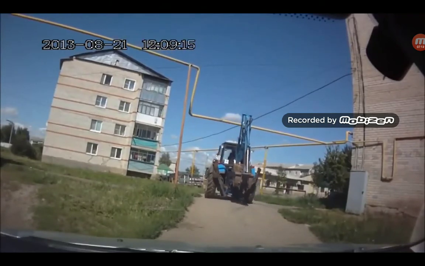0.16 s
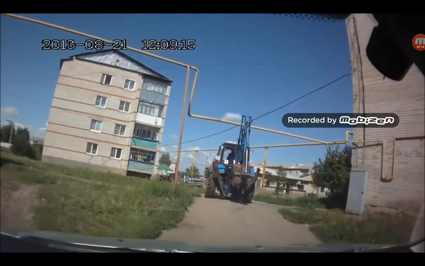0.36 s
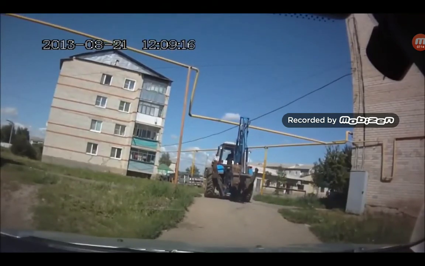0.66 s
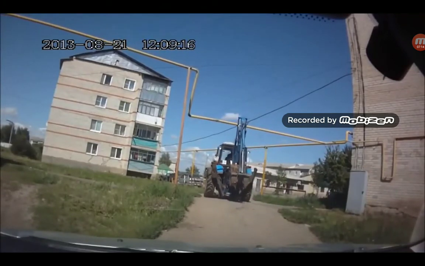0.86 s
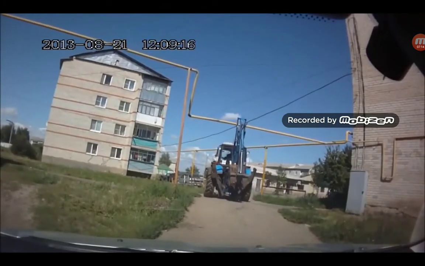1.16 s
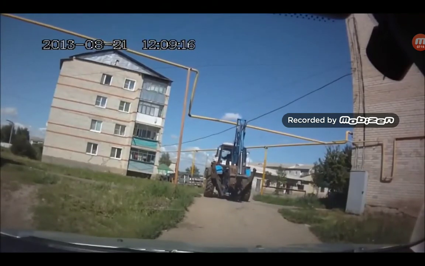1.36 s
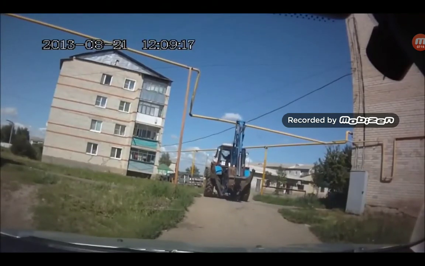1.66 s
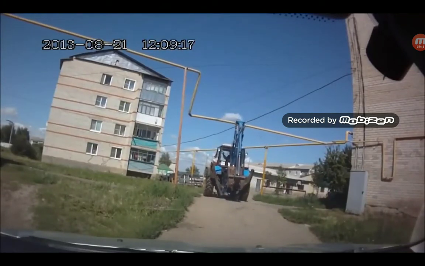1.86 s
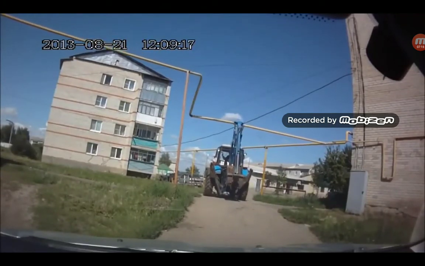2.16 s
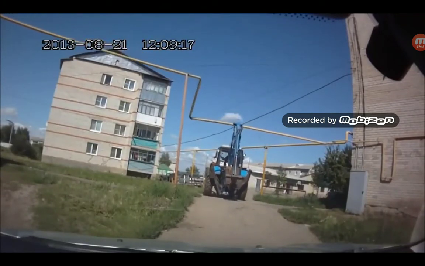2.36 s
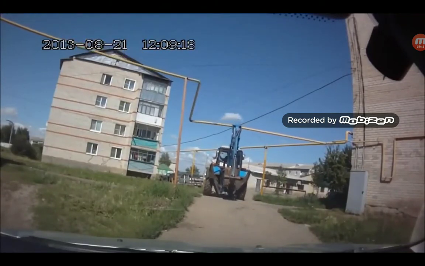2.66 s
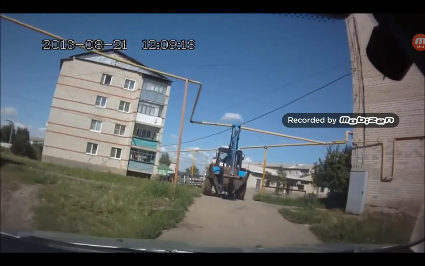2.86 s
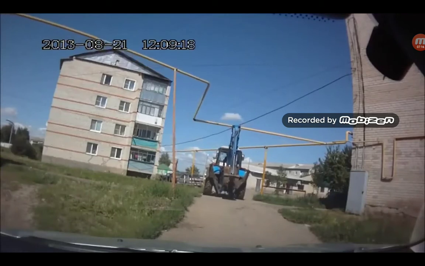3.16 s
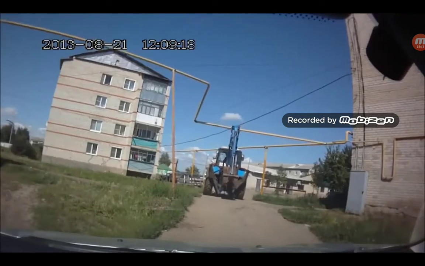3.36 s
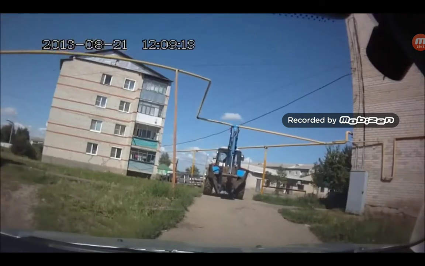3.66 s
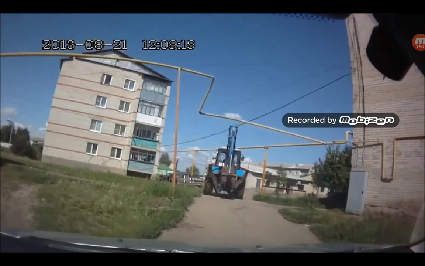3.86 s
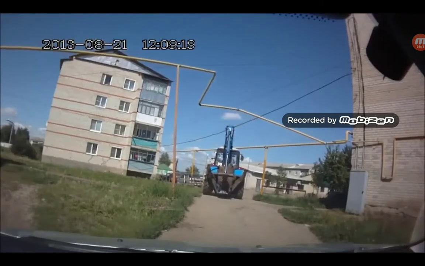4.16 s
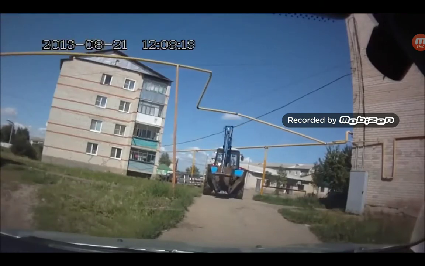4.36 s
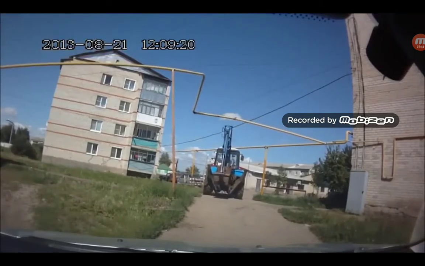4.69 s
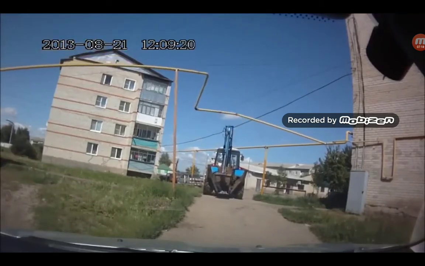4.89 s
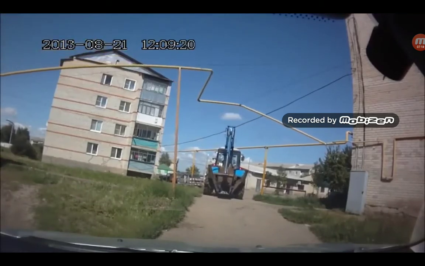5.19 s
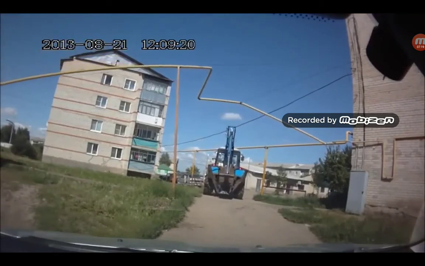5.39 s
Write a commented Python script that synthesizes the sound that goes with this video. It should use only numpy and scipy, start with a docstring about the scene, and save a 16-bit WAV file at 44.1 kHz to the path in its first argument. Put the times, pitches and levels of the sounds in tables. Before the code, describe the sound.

A loud two-note car horn sounds from the very start, heard from inside a car creeping along a dirt lane. It holds a steady pitch until about 3.4 seconds, with a faint echo and a rasp from the slightly overloaded dashboard microphone. Beneath it, engine and tyres drone and loose plastic trim chatters, with brief rattles near 1, 2.2 and 3.2 seconds. In the short gap a sharp knock sounds at about 3.6 seconds, and the horn immediately returns for half a second, ending near 4.1 seconds. The cabin drone then steps up and slowly grows as the car pulls on, joined by a rough, wavering whine from the drive train. Another hard knock over a rut comes at about 4.5 seconds, followed by a softer knock near 5.1 seconds and a small rattle near 5.3. The drone and whine continue to the end.

```python
"""Honking behind a tractor

Inside a car creeping along a dirt lane, a two-note horn is held, let go briefly and pressed again.
Engine and tyres drone through the cabin, loose trim rattles and knocks over the ruts, and the drive
train whines as the car pulls on. A small dashboard microphone overloads, mixing the notes into a rasp."""
import sys
import numpy as np
from scipy import signal
from scipy.fft import rfft, irfft, next_fast_len
from scipy.io import wavfile
from scipy.ndimage import map_coordinates

SR = 44100
rng = np.random.default_rng(int(sys.argv[2]) if len(sys.argv) > 2 else 0)


def unload_audio(sound):
    """Save the sound as a 16-bit wav file, at the path given as the first command line argument."""
    columns = np.transpose(np.atleast_2d(sound))
    # keep every value between -1 and 1, then stretch to whole-number steps
    steps = np.round(np.clip(columns, -1, 1) * 32767)
    wavfile.write(sys.argv[1], SR, steps.astype(np.int16))


N = 243861
TIME = np.arange(N) / SR

# the horn button: (pressed [s], released [s])
HORN_PRESSES = [(-.1, 3.362), (3.622, 4.127)]
# each horn's harmonics, the tones at 1, 2, 3 ... times its pitch:
# (level [dB], drift as the car moves between houses [dB/s], change until the low horn settles [dB])
LOW_HORN = [(-23, 0, -1.5), (-23, -0.66, 0.5), (-26.5, -0.16, -1.5), (-37, 0, 1.5), (-36, 0, 5),
            (-58.5, 1, 0.5), (-55.5, 0, 0)]
HIGH_HORN = [(-32, -0.19, 0), (-26.5, 0.23, 0.024), (-24.5, -0.091, 0.017), (-26.5, -.2, 0.026),
             (-39.5, -0.078, -0.22), (-61.5, 0, 0), (-59, 0, 0), (-63, 0.15, 0)]
# tones the horns make together: (multiple of the low pitch, multiple of the high pitch, level [dB])
MIXED_TONES = [(-1, 2, -42), (1, 1, -46), (3, 1, -44), (3, 2, -50), (1, 5, -57), (1, 6, -61), (4, 5, -60),
               (3, 6, -62), (2, 7, -60), (1, 8, -60), (6, 4, -61), (4, 6, -62)]
# raspy hiss that sounds with the horns: (frequency [Hz], relative level [dB])
HISS_SPECTRUM = [(300, -27), (550, 4), (1000, -0.5), (1500, -5), (2100, -2.5), (2600, -15.5), (3400, -18),
                 (4400, -9.5), (4900, -17.5), (6000, -24.5), (7600, -44), (10500, -46.5), (13000, -62)]
# engine and tyres in the cabin: (frequency [Hz], relative level [dB])
DRONE_SPECTRUM = [(30, -45.5), (55, -34.5), (82, -29.5), (115, -5), (180, -5.5), (250, 0.5), (350, 1.5),
                  (480, -3), (720, -6.5), (1030, -15.5), (1500, -7.5), (2500, -34), (6000, -59.5),
                  (12000, -78.5)]
# pitches at which the cabin rings: (pitch [Hz], rough width [Hz], relative level [dB])
CABIN_RESONANCES = [(372.5, 35, -5.5), (676.5, 30, -11), (1377.5, 55, -2.5), (1984, 28, -9.5)]
# brief swells in level: (middle [s], half length [s], trim chatter swell [dB], cabin drone swell [dB])
SWELLS = [(.1, .15, 4, 1.5), (1.15, .15, 5, 0.5), (2.2, 0.26, 6.5, .5), (3.273, 0.1, 8, 1),
          (3.499, 0.16, 10, 4.5), (4.35, .16, 4.5, 1.5)]
# buzz of the dashboard and trim: (frequency [Hz], relative level [dB])
TRIM_SPECTRUM = [(700, -28), (1100, -9.5), (1400, 4.5), (1650, -1), (2050, 0), (2600, -15), (2950, -11),
                 (3250, -28.5), (4400, -24.5), (5000, -38.5), (5900, -41), (7000, -57), (10000, -63.5),
                 (13000, -68.5)]
# one rattle per loose part: (start [s], level [dB], fade time [s], ring pitch [Hz], relative crack [dB])
RATTLE_BURSTS = [(.072, -26, 0.034, 1426, -24), (1.044, -22, .018, 2250, -3),
                 (2.02, -28.5, 0.028, 2050, -15), (2.232, -20, 0.021, 2190, -3.5),
                 (2.245, -28, 0.062, 1750, -17), (3.179, -18.5, 0.032, 990, -4.5),
                 (3.205, -30.5, 0.045, 2140, -13), (3.385, -27, 0.063, 2176, -7),
                 (5.331, -27.5, 0.036, 1380, -19.5)]
# clatter of a loose part: (frequency [Hz], relative level [dB])
CLATTER_SPECTRUM = [(100, -50.5), (500, -18), (1000, -6), (1500, -2), (2200, -1.5), (2550, -13),
                    (2900, -8.5), (3300, -25), (6000, -38), (12000, -63)]
# crack of hard plastic meeting: (frequency [Hz], relative level [dB])
CRACK_SPECTRUM = [(60, -50), (900, -0.5), (2000, 7.5), (3300, -12), (4300, -5.5), (5000, -13.5),
                  (5900, -19), (7500, -40.5), (10500, -46.5), (14000, -57)]
# knocks over ruts:
# (start [s], ring peak [dB], contact time [s], pitch factor, brightness [dB/octave], relative crack [dB])
RUT_KNOCKS = [(3.583, -15, 0.00275, 0.84, -2, -4), (3.5883, -5.5, 0.0027, 1.22, -8, -15.5),
              (4.4533, -2.5, .0025, 1.01, 1, -9), (4.489, -22.5, .003, 1.1, 6, -5),
              (5.128, -17.5, 0.0052, 0.81, -8.5, -24)]
# tones of a knocked panel: (base pitch [Hz], time to fade by 60 dB [s], relative level [dB])
PANEL_TONES = [(380, 0.045, -13.5), (626, 0.032, -1), (824, 0.019, -3.5), (1200, 0.027, 0),
               (1506, .015, -4.5), (1980, .022, -3), (2250, .02, -9), (4090, 0.015, -17.5)]
# tone colour of the microphone's overload: (frequency [Hz], gain [dB])
RASP_SPECTRUM = [(40, -40.5), (150, -19.5), (500, 3.5), (1700, 5), (2600, -8), (3400, -9.5), (4400, -2.5),
                 (5000, -4.5), (6000, -2), (7500, -19.5), (12000, -24.5)]

LOW_HZ, HIGH_HZ, HIGH_SAG_HZ_PER_S = 407.6, 494.75, .14
SETTLE_S, SLIP_S, SLIP_HZ = .62, .05, 1.65  # the low horn slips up: done by when, how fast, how far
PULL_S, STEP_S = 4.17, .15  # when the car pulls on; how long the step up in level takes
DRONE_DB, DRONE_STEP_DB, DRONE_DB_PER_S = -35, 2, 2.0  # base level, step after the horn, growth with speed
TRIM_DB, TRIM_STEP_DB = -36, 1.5
WHINE_HZ, WHINE_DB, WHINE_DB_PER_S = 1370, -38.5, 3


def undb(db):
    """Turn decibels into a gain to multiply by."""
    return 10 ** (np.asarray(db) / 20)


def unit(x):
    """Scale a sound to an average strength (rms) of 1."""
    return x / np.sqrt(np.mean(x ** 2))


def colour(x, spectrum):
    """Filter a sound along a curve of (frequency [Hz], gain [dB]) points."""
    hz, db = np.transpose(spectrum)
    size = next_fast_len(N + 8192)
    bin_hz = np.maximum(np.fft.rfftfreq(size, 1 / SR), 1)
    gain = undb(np.interp(np.log(bin_hz), np.log(hz), db))
    return irfft(rfft(x, size) * gain, size)[:N]


def noise(spectrum):
    """Noise of strength 1 with the given tone colour."""
    return unit(colour(rng.standard_normal(N), spectrum))


def resonate(x, hz, width_hz):
    """Pass a sound twice through a resonance, giving a ring of strength 1."""
    peak = signal.iirpeak(hz, hz / width_hz, fs=SR)
    return unit(signal.lfilter(*peak, signal.lfilter(*peak, x)))


def walk(rate):
    """Smooth random drift of about 1 either way, changing about rate times a second."""
    return map_coordinates(rng.standard_normal(4096), [TIME * rate], order=3, mode="wrap")


def unsettled():
    """1 while the low horn is still on its first note, 0 once it has settled."""
    return np.clip((SETTLE_S - TIME) / SLIP_S, 0, 1)


def diaphragm_phase(hz, jitter_hz=0.27):
    """Phase of a horn's diaphragm, the vibrating disc inside it, whose pitch trembles a little."""
    return 2 * np.pi * np.cumsum(hz + jitter_hz * walk(40)) / SR


def horn(phase, harmonics, smear, waver_db):
    """A diaphragm's pulses, smeared by its coiled trumpet; each harmonic wavers as reflections shift."""
    out = 0
    for k, (db, drift_db_per_s, early_db) in enumerate(harmonics, 1):
        level_db = db + drift_db_per_s * TIME + early_db * unsettled()
        level_db += waver_db * np.sqrt(k) * walk(5.98)
        out += np.sqrt(2) * undb(level_db) * np.sin(k * phase + smear * k ** 2)
    return out


def horns(attack_s=0.0072, release_s=0.018, hiss_db=-33, echo_db=-24, echo_s=0.075):
    """Two horns a minor third apart share one button and echo faintly off the house fronts."""
    gate, held_s = 0, 0
    for on, off in HORN_PRESSES:
        rise = 1 - np.exp(-np.maximum(TIME - on, 0) / attack_s)
        gate += rise * np.exp(-np.maximum(TIME - off, 0) / release_s)
        held_s = np.where(TIME > on, TIME - on, held_s)
    # the low horn slips up once; the high one sags for as long as it is held
    low = diaphragm_phase(LOW_HZ + SLIP_HZ * (1 - unsettled()))
    high = diaphragm_phase(HIGH_HZ - HIGH_SAG_HZ_PER_S * held_s)
    notes = horn(low, LOW_HORN, smear=0.907, waver_db=0.32)
    notes += horn(high, HIGH_HORN, smear=.3, waver_db=.5)
    # sounding together, they add tones at sums and differences of their harmonics
    mixed = sum(np.sqrt(2) * undb(db) * np.sin(m * low + n * high + rng.uniform(0, 2 * np.pi))
                for m, n, db in MIXED_TONES)
    # the hiss comes in spurts, on the crests of the two notes
    hiss = unit(colour(rng.standard_normal(N) * notes, HISS_SPECTRUM))
    direct = gate * (notes + mixed + undb(hiss_db) * hiss)
    reflections = rng.standard_normal(SR) * np.exp(-TIME[:SR] / echo_s)
    echo = signal.fftconvolve(direct, reflections / np.linalg.norm(reflections))[:N]
    return direct + undb(echo_db) * echo


def step_up():
    """0 until just after the horn's last note, then a quick rise to 1."""
    return np.clip((TIME - PULL_S) / STEP_S, 0, 1)


def pulling_s():
    """Seconds for which the car has been gathering speed."""
    return np.maximum(TIME - PULL_S, 0)


def swells():
    """Brief swells of the chatter and the drone, in decibels, strongest while the horn is let go."""
    chatter, drone = 0, 0
    for middle_s, half_s, chatter_db, drone_db in SWELLS:
        hump = np.exp(-((TIME - middle_s) / half_s) ** 2)
        chatter += chatter_db * hump
        drone += drone_db * hump
    return chatter, drone


def cabin_drone(swell_db, noise_db=4.0, flutter_db=0.5, waver_db=1.0):
    """Engine and tyres drone and ring the cabin; it steps up once the horn stops and grows with speed."""
    out = noise(DRONE_SPECTRUM) * undb(noise_db + flutter_db * walk(22))
    for hz, width_hz, db in CABIN_RESONANCES:
        ring = resonate(rng.standard_normal(N), hz, 1.7 * width_hz)  # wider, as two passes narrow it
        out += ring * undb(db + waver_db * walk(8.7))
    return out * undb(DRONE_DB + DRONE_STEP_DB * step_up() + DRONE_DB_PER_S * pulling_s() + swell_db)


def trim_chatter(swell_db):
    """Loose plastic chatters in tiny taps, harder on rough ground and as the car pulls on."""
    taps = rng.standard_normal(N) * undb(1.8 * walk(400))
    return unit(colour(taps, TRIM_SPECTRUM)) * undb(TRIM_DB + TRIM_STEP_DB * step_up() + swell_db)


def rattles(rise_s=0.003, grain_db=2.0, clatter_db=-2, ring_db=-3, width_hz=150):
    """Each bump sets a part of the trim clattering and ringing for a moment."""
    taps = rng.standard_normal(N) * undb(grain_db * walk(400))
    clatter = unit(colour(taps, CLATTER_SPECTRUM))
    crack = unit(colour(taps, CRACK_SPECTRUM))
    out = 0
    for start, db, fade_s, ring_hz, crack_db in RATTLE_BURSTS:
        age = np.maximum(TIME - start, 0)
        envelope = (1 - np.exp(-age / rise_s)) * np.exp(-age / fade_s)
        ring = resonate(taps, ring_hz, width_hz)
        sound = undb(clatter_db) * clatter + undb(ring_db) * ring + undb(crack_db) * crack
        out += undb(db) * envelope * sound
    return out


def knocks(crack_s=0.0033):
    """Blows ring loose panels in the cabin: the ring builds up during the contact, with a crack on top."""
    out = np.zeros(N)
    age = TIME[:SR // 4]
    grit = noise(CRACK_SPECTRUM)
    for start, peak_db, contact_s, pitch, brightness, crack_db in RUT_KNOCKS:
        ring = 0
        for hz, fade_s, db in PANEL_TONES:
            gain = undb(db + brightness * np.log2(hz / 1000))
            tone = np.sin(2 * np.pi * pitch * hz * age + rng.uniform(0, 2 * np.pi))
            ring += gain * tone * undb(-60 * age / fade_s)
        blow = ring * (1 - np.exp(-(age / contact_s) ** 2))
        span = slice(int(start * SR), int(start * SR) + len(age))
        crack = grit[span] * age / crack_s * np.exp(-age / crack_s)
        out[span] += undb(peak_db) * (blow / np.abs(blow).max() + undb(crack_db) * crack)
    return out


def whine(roughness=0.46, wander_hz=16, waver_hz=24, swell_db=2.5):
    """The drive train, which turns the wheels, gives a rough, wavering whine as the car pulls on."""
    hz = WHINE_HZ + waver_hz * walk(45) + wander_hz * walk(7)
    phase = 2 * np.pi * np.cumsum(hz) / SR
    gain = step_up() * undb(WHINE_DB + WHINE_DB_PER_S * pulling_s() + swell_db * walk(9))
    return gain * unit((1 + roughness * walk(70)) * np.sin(phase))


def scene():
    """All the sounds meet at the windscreen, in one channel."""
    chatter_db, drone_db = swells()
    mix = horns() + cabin_drone(drone_db) + trim_chatter(chatter_db) + rattles() + knocks() + whine()
    return mix[None]


def record(dry, drive=1.1, bias=0.089, low_hz=45.7, top_hz=14000):
    """The overloaded microphone squashes the crests unevenly, adding a rasp; bass and top are cut."""
    clean = dry[0]
    squashed = (np.tanh(drive * clean + bias) - np.tanh(bias)) * np.cosh(bias) ** 2 / drive
    rasp = colour(squashed - clean, RASP_SPECTRUM)
    bass_cut = signal.butter(4, low_hz, "high", fs=SR, output="sos")
    top_cut = signal.ellip(8, .2, 70, top_hz, fs=SR, output="sos")
    return signal.sosfilt(top_cut, signal.sosfilt(bass_cut, clean + rasp))[None]


dry = scene()
out = record(dry)
unload_audio(out)
```